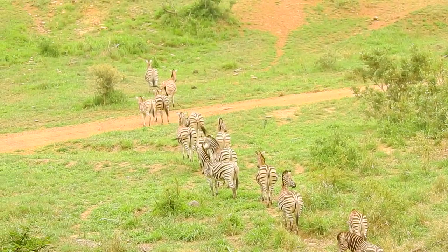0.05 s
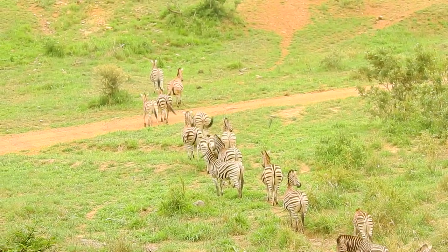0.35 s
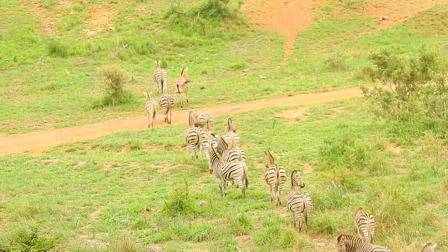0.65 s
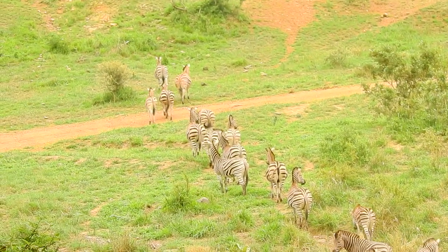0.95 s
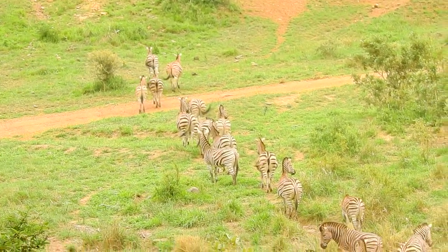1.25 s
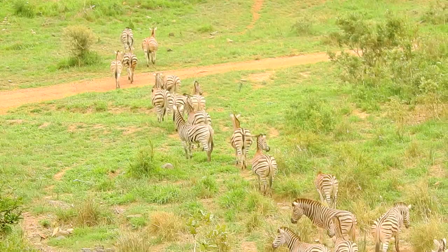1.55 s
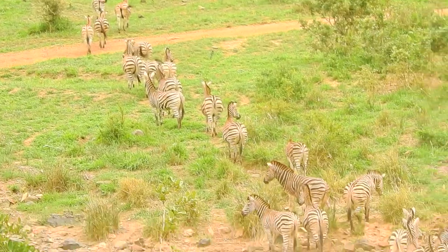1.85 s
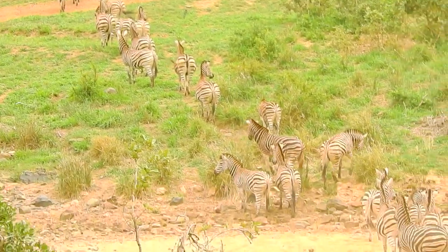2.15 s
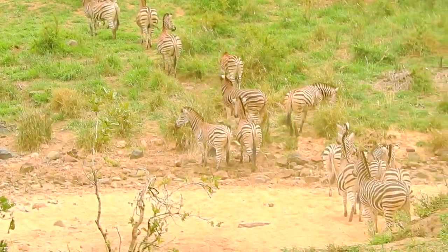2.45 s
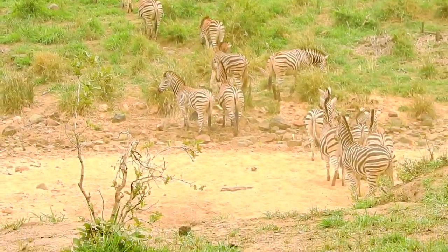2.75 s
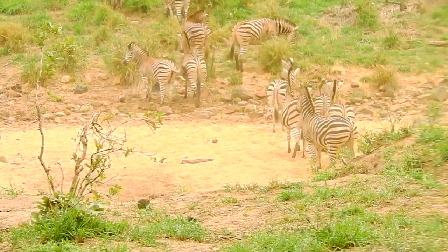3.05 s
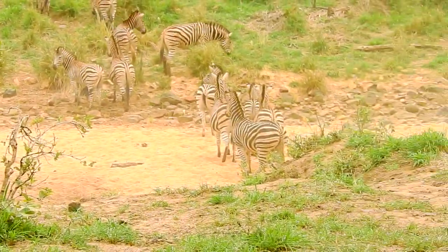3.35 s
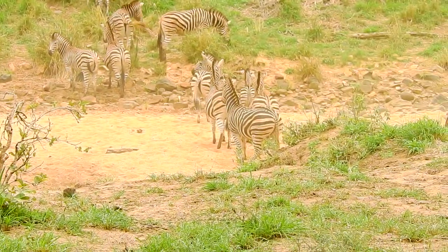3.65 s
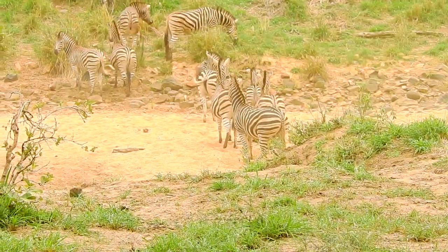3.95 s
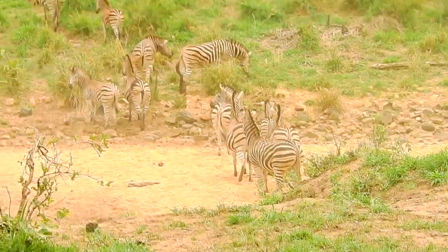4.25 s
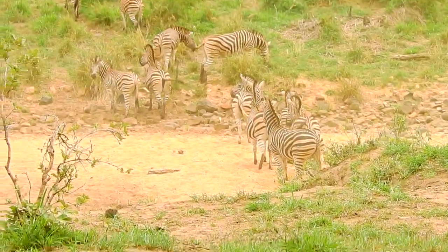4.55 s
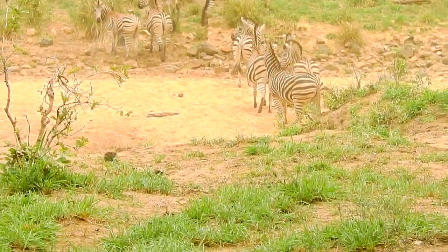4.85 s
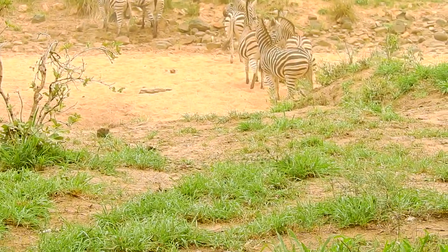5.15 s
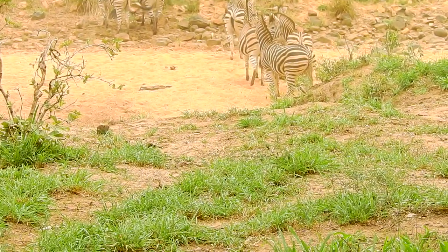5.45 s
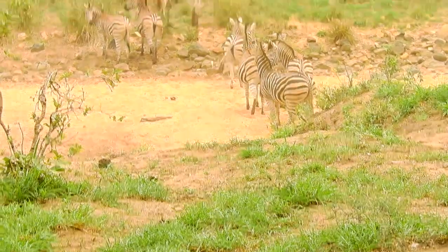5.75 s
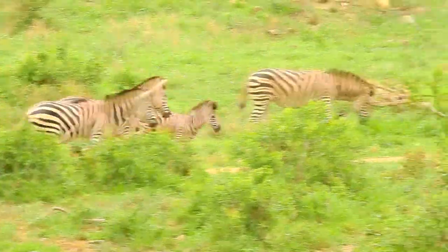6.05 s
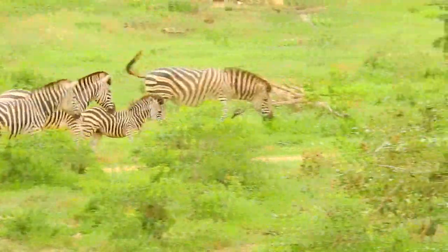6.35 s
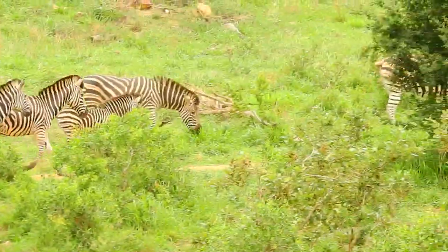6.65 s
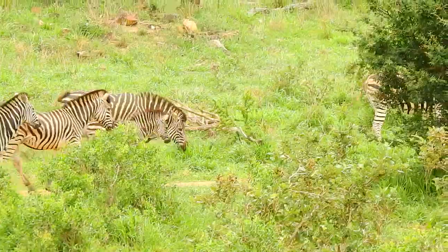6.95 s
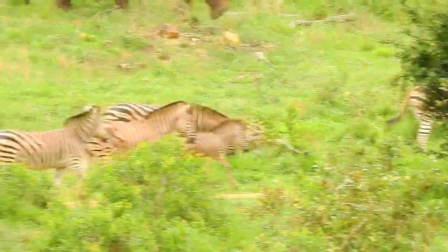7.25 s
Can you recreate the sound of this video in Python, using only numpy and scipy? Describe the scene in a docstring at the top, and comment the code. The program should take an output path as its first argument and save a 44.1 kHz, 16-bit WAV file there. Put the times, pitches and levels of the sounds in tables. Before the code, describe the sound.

Zebras walk over dry, stony ground in open bush, crunching gravel, snapping twigs and now and then knocking a hoof on stone. Grass hisses, cicadas buzz in short high pulses and small birds chirp throughout. The steps thin out after the first few seconds. Near the end, as a breeze rumbles more strongly on the microphone, one zebra gives a loud, hoarse bark with a faint echo.

```python
"""A zebra herd walks over dry, stony ground in open bush. From the start grass hisses, a breeze buffets
the two microphone ports, cicadas click their tymbals in buzzes and small birds whistle. Gravel and twigs
fracture underfoot; within the first second hooves also knock on stones and stalks snap. A thin whistle
sinks at 2.4 s and a soft hoot sounds at 4.2 s. Near 6.4 s, as the breeze grows, one zebra's vocal folds
vibrate unevenly in a hoarse bark, which a far slope reflects."""
import sys
import numpy as np
from scipy import signal
from scipy.fft import rfft, irfft, next_fast_len
from scipy.io import wavfile
from scipy.ndimage import uniform_filter1d

SR = 44100
rng = np.random.default_rng(int(sys.argv[2]) if len(sys.argv) > 2 else 0)


def inscribe(sig):
    """Save sig as 16-bit PCM at rate SR to the path in sys.argv[1].

    A 1-D sig is mono; a 2-D sig holds one channel per row.
    Samples are clipped to [-1, 1] before scaling.
    """
    pcm = np.round(np.clip(np.atleast_2d(sig).T, -1, 1) * 32767)
    wavfile.write(sys.argv[1], SR, pcm.astype(np.int16))


N = 331191
T = np.arange(N) / SR

# Levels in the tables are relative: each source adds its own gain.
# coherence of the two microphone ports: (frequency [Hz], correlation [0-1])
PORT_COHERENCE = [(60, 0.3), (250, 0.63), (650, 0.79), (3000, 0.82), (6800, 0.27), (9000, 0), (15000, 0)]
# spectra of the noisy sources: (frequency [Hz], spectral level [dB])
AIR_SPECTRUM = [(25, -20), (55, -4), (90, -11), (200, 1), (800, -2.5), (2000, -8), (2900, -13), (3900, -26),
                (5000, -6.5), (7100, -10.5), (9000, -9), (11000, -19.5), (15500, -30.5)]
RUSTLE_SPECTRUM = [(150, -24), (500, -5), (1400, -3.5), (2200, -7), (3400, -1.5), (5000, -1.5), (6600, 6),
                   (7800, -2), (10000, -12), (12000, -22), (15500, -50)]
BREEZE_SPECTRUM = [(20, -32), (40, -34), (60, -5), (80, -15), (115, 0), (170, 1.5), (250, -4.5), (400, -14),
                   (800, -27.5), (2000, -30), (12000, -80)]
CICADA_SPECTRUM = [(4000, -23.5), (6000, -41), (7000, -4), (8000, -10.5), (8900, 0.5), (9600, -1.5),
                   (10300, -4), (11300, -14), (12500, -74)]
GRIT_SPECTRUM = [(1500, -43), (4000, -12), (5300, -3.5), (6600, 8.5), (7600, 0), (9000, -12),
                 (11500, -25.5), (15500, -51)]
CRACK_SPECTRUM = [(700, -23), (1900, -9), (3200, 14.5), (4400, 5.5), (7000, -30)]
BODY_SPECTRUM = [(100, -16), (350, 4), (650, 6), (1000, 3), (1400, 4), (2000, -1.5), (4000, -16),
                 (15000, -50)]
SNAP_SPECTRUM = [(300, -16), (2000, -7), (4500, -4.5), (7000, 7), (9000, -1.5), (12000, -25), (15500, -31)]
# envelopes of the continuous sources: (time [s], level [dB])
RUSTLE_ENVELOPE = [(0.0, -44.5), (0.67, -45), (0.88, -40), (1.09, -42), (1.34, -51), (1.48, -44),
                   (1.65, -42), (2.38, -47), (2.76, -48), (3.05, -52), (3.66, -50.5), (3.87, -45),
                   (4.1, -56.5), (4.35, -48), (4.77, -56), (6.04, -51.5), (6.82, -46), (7.1, -54),
                   (7.51, -48.5)]
INSECT_ENVELOPE = [(0, -62), (3.2, -57), (3.5, -57), (4.7, -56), (5.5, -55), (7.5, -74)]
BREEZE_ENVELOPE = [(0, -70), (.85, -67), (1.0, -52.5), (1.3, -61), (1.5, -47.5), (1.68, -58), (1.95, -52.5),
                   (2.5, -52.5), (3.0, -62), (3.4, -72.5), (3.78, -53.5), (4.1, -69.5), (4.7, -68),
                   (5.05, -67), (5.25, -65.5), (5.8, -56.5), (6.1, -42.5), (6.9, -46), (7.51, -39.5)]
# puffs of air on the ports: (time [s], level [dB], centre [Hz], left minus right [dB])
PUFFS = [(0.946, -51, 129, -23), (1.106, -36.5, 156, -25), (1.431, -37, 145, 5), (1.539, -39.5, 159, -15),
         (1.775, -44.5, 121, -20), (1.868, -43.5, 167, 18), (1.958, -39.5, 180, 27.5),
         (2.146, -36, 122, -3), (2.429, -32, 180, 7), (2.768, -42.5, 144, -11), (2.966, -48, 246, -16),
         (3.13, -45, 183, -22), (3.488, -45.5, 170, -12), (3.972, -49, 140, -11), (4.908, -48, 85, -21),
         (4.962, -52.5, 149, -22), (5.111, -45, 216, 1), (5.343, -50, 167, -16), (5.405, -47, 143, -10),
         (5.57, -44.5, 199, -23.5), (5.65, -46.5, 173, -18), (5.776, -43, 169, -9), (5.942, -38, 296, 12),
         (6.378, -32.5, 158, -23), (6.592, -33.5, 166, 25), (7.364, -28.5, 130, 1), (7.466, -26, 142, -3)]
# cicada buzzes: (time [s], length [s], level [dB], nominal click rate [1/s], body resonance [Hz])
CICADA_BUZZES = [(0, 0.13, -41.5, 250, 8650), (.21, 0.28, -42.5, 432, 8850),
                 (0.443, 0.19, -47.5, 420, 8650), (0.623, .27, -42.5, 450, 8900),
                 (0.844, 0.24, -48, 370, 8650), (1.045, 0.3, -43.5, 380, 9000),
                 (1.274, 0.22, -47, 420, 8700), (1.453, 0.25, -40, 390, 8940),
                 (1.678, 0.23, -46, 470, 8700), (1.856, 0.3, -42.5, 432, 9040), (2.1, .18, -50, 640, 8650),
                 (2.286, .27, -42.5, 520, 8900), (2.523, .16, -45.5, 420, 8600),
                 (2.737, 0.27, -43, 432, 8700), (2.942, 0.17, -46, 420, 8650), (3.2, 0.28, -43, 432, 8840),
                 (3.599, .29, -43.5, 432, 8800), (4.017, 0.26, -42, 432, 8800),
                 (4.42, 0.24, -41.5, 432, 8700), (4.82, 0.28, -43, 470, 8800),
                 (5.199, 0.36, -42.5, 432, 8740), (5.5, 0.25, -44.5, 440, 8500),
                 (5.655, 0.3, -43, 432, 8850), (5.914, 0.12, -38.5, 430, 8160),
                 (6.06, 0.22, -49, 432, 8800), (6.348, .2, -39.5, 490, 8400), (6.53, 0.12, -48, 460, 8940),
                 (6.796, 0.23, -40.5, 450, 8200), (7.235, .21, -39, 590, 8300)]
# heavy steps on gravel and twigs: (time [s], level [dB], weight of crack and body [dB], crumbling [ms])
HEAVY_STEPS = [(0.0747, -31.5, -16.5, 1.4), (0.2766, -33.5, -35, 3.4), (0.29, -30, -29, 2),
               (0.3153, -32, -18, 2.9), (0.343, -32, -15, 7), (0.412, -32.5, -19, 1.8),
               (0.439, -38, -11, 2), (0.4757, -39.5, -5.5, 6), (0.584, -33.5, -37, 1.4),
               (0.6696, -27.5, -12.5, 1.7), (0.763, -31.5, -20, 2.4), (0.792, -31.5, -11, 4.9),
               (0.813, -30, -14.5, 8.7), (0.848, -29.5, -15, 4.3), (0.863, -33.5, -10.5, 2),
               (0.9226, -24.5, -38, 3.7), (0.9735, -28, -12.5, 5.2), (1.0092, -27.5, -18, 2.3),
               (1.2492, -24, -15.5, 2.9), (1.4315, -30, -17.5, 2.3), (1.4474, -33.5, -14.5, 2.1),
               (1.492, -21, -16.5, 3.3), (1.5278, -21, -18, 4), (1.5507, -31.5, -13, 5.3),
               (1.6335, -31.5, -11, 4.2), (1.649, -38, -21, 2), (2.1041, -36, -21, 2.6),
               (2.1623, -30.5, -14, 4.9), (2.1738, -21, -22, 3.6), (2.1778, -24.5, -23, 1.1),
               (2.1865, -26, -23, 4.3), (2.2017, -23.5, -28, 3.7), (2.2214, -28, -17, 4.1),
               (2.2372, -23, -26, 1.1), (2.2492, -20.5, -17.5, 2.4), (2.3249, -37, -26, 3.7),
               (2.3372, -32, -21, 0.89), (2.397, -22, -27, 0.96), (2.4887, -23.5, -18, 1.6),
               (2.5227, -32.5, -35, 1.9), (2.5496, -33.5, -19, 6.4), (2.5721, -36.5, -11, 2.4),
               (2.6419, -36, -20, 1.8), (2.7191, -23, -14.5, 1.6), (2.794, -30.5, -16.5, 17),
               (2.889, -29, -22.5, 3.9), (2.9779, -37.5, -15.5, 1.1), (3.183, -33, -15.5, 2.3),
               (3.8407, -41, -9, 6.2), (3.8847, -43, -2, 3.9), (4.1172, -21.5, -18.5, 1.26),
               (4.306, -33.5, -20, 2.8), (4.372, -46, -9, 3.4), (4.5324, -38.5, -10.5, 6.6),
               (5.0913, -49, -22, 3), (5.2804, -40, -18, 1.9), (5.3684, -28, -46, 1.7),
               (6.0704, -38, -11, 12), (6.2921, -44, -30, 1.2), (6.8827, -31.5, -15.5, 18)]
# bird notes by kind: (time [s], length before a 0.18 s cap [s], middle pitch [Hz], level [dB])
WHISTLE_NOTES = [(1.262, 0.081, 5230, -49), (1.582, 0.033, 4740, -48), (1.764, 0.033, 4940, -50),
                 (1.9, 0.039, 4700, -47.5), (1.99, 0.059, 5450, -50), (2.314, 0.02, 4600, -48),
                 (3.09, 0.055, 4300, -59), (3.25, 0.11, 5800, -59), (3.34, 0.064, 5300, -61),
                 (3.52, 0.05, 4860, -65), (3.725, 0.042, 5200, -66), (3.935, 0.053, 4950, -55.5),
                 (3.98, 0.11, 5000, -62), (4.145, 0.055, 5070, -51.5), (4.57, 0.068, 4950, -63),
                 (4.787, 0.06, 4720, -50.5), (5.052, 0.069, 5350, -52), (5.29, 0.085, 5420, -51.5),
                 (5.758, 0.062, 4720, -52.5), (5.79, 0.06, 4390, -53.5), (6.118, 0.066, 4780, -53.5),
                 (6.372, 0.078, 4980, -54), (6.505, 0.065, 4830, -57), (6.595, 0.074, 4700, -51)]  # high, falling ever faster
SLUR_NOTES = [(1.33, 0.12, 2720, -64), (1.908, 0.054, 3440, -53), (4.074, 0.045, 3200, -58),
              (4.255, 0.026, 3240, -58), (4.712, 0.074, 2825, -56.5), (5.478, 0.038, 3540, -49.5),
              (5.679, 0.053, 2790, -53.5), (5.743, 0.068, 4820, -48), (6.016, 0.073, 3120, -62),
              (6.292, 0.073, 2930, -60), (6.51, 0.079, 2990, -53.5), (6.985, 0.043, 2400, -54),
              (7.135, 0.098, 2670, -60)]  # dropping, then levelling off
PIP_NOTES = [(0.08, 0.084, 3850, -54), (0.085, 0.035, 5770, -45), (0.155, 0.033, 2540, -52),
             (0.72, 0.06, 3900, -51.5), (3.022, 0.065, 4610, -52), (4.607, .02, 3600, -59),
             (4.632, 0.018, 3300, -57)]  # loudest near the onset
RISING_NOTES = [(0.143, 0.017, 4100, -50), (1.695, 0.055, 4200, -51), (5.6, 0.08, 1770, -61.5)]
TICK_NOTES = [(5.18, 0.019, 3250, -51.5), (5.336, 0.016, 3600, -49), (5.469, 0.013, 4520, -46)]  # very short, ending in a steep fall
WHEEZE_NOTES = [(1.305, 0.155, 4450, -48.5), (1.335, 0.115, 5270, -52)]  # two sinking voices
DRAWL_NOTES = [(0.205, 0.11, 3484, -49), (0.27, 0.24, 2840, -57), (0.765, 0.23, 3520, -50),
               (0.89, 0.1, 2900, -66), (3.654, 0.061, 3130, -56.5)]  # drawn out, barely sinking
RASP_NOTES = [(0.15, 0.085, 3550, -50), (0.77, 0.16, 3560, -56), (1.725, 0.12, 5900, -45),
              (1.955, 0.05, 5670, -56), (3.275, 0.038, 2414, -51), (3.425, 0.043, 2600, -56),
              (3.562, 0.039, 2680, -59), (3.72, 0.039, 2695, -62), (4.385, 0.051, 3400, -55),
              (4.68, 0.062, 4370, -58), (4.84, 0.078, 4300, -61), (5.065, 0.045, 4260, -54),
              (5.82, 0.09, 4700, -54.5), (7.0, 0.063, 3130, -57), (7.207, 0.053, 2300, -53.5)]  # noisy, from deep in the bushes
# their contours: (start / middle pitch [ratio], end / middle pitch [ratio], rasp [0-1], peak place [0-1])
WHISTLE_CONTOUR = (1.09, 0.825, 0.25, .64)
SLUR_CONTOUR = (1.08, 0.97, 0.25, 0.36)
PIP_CONTOUR = (1.01, 0.74, 0.19, 0.15)
RISING_CONTOUR = (0.76, 1.11, 0.41, 0.67)
TICK_CONTOUR = (0.88, 0.68, 0.94, 0.32)
WHEEZE_CONTOUR = (1.09, 0.915, 0.3, .4)
DRAWL_CONTOUR = (1.02, 0.99, 0.62, 0.58)
RASP_CONTOUR = (1.4, 1, 0.88, 0.47)
# quick trills: (time [s], notes [count], spacing [s], note length [s],
# start pitch [Hz], middle pitch [Hz], end pitch [Hz], rasp [0-1], level [dB])
BIRD_TRILLS = [(4.435, 6, 0.04, 0.04, 3220, 2690, 3170, .12, -57),
               (4.953, 6, 0.038, 0.0093, 5200, 5680, 6500, 0.3, -53),
               (5.702, 4, 0.044, 0.0146, 3060, 2470, 2260, .4, -58),
               (6.903, 3, 0.031, 0.00716, 5000, 5660, 6430, 0.3, -47)]
# birdsong that arrives by way of the bushes: (time [s], share of power [0-1])
SCATTERED_SHARE = [(0, .6), (1, .6), (1.3, .35), (2.1, .45), (3.1, .5), (4.1, .36), (7.5, .3)]
# hoof impacts on stone: (time [s], level [dB], resonance [Hz])
HOOF_KNOCKS = [(0.475, -40, 600), (0.97, -49, 1280), (1.175, -41, 726), (1.251, -32.5, 606),
               (1.468, -40, 600), (1.565, -39, 1280), (2.209, -41, 536), (2.373, -37, 920),
               (2.587, -38, 950), (4.174, -43.5, 930), (4.573, -38, 621), (4.873, -44, 1240),
               (5.921, -43.5, 1000), (7.202, -42, 1080), (7.236, -38.5, 1110), (7.317, -36.5, 584),
               (7.374, -32.5, 562)]
# dry stalks breaking: (time [s], level [dB])
STALK_SNAPS = [(0.9236, -29.5), (.9741, -33), (1.0098, -33), (1.2486, -30), (2.2029, -29), (2.3369, -29.5),
               (2.717, -33), (2.72, -26), (3.965, -47), (4.3072, -38), (5.986, -41), (6.0712, -38.5),
               (6.0765, -42), (6.2927, -41.5)]
# the bark, a loud push and a weaker one: (time [s], pitch [Hz], level [dB], roughness [0-1])
BARK_CONTOUR = [(6.44, 314.5, -51, 0.4), (6.525, 326.5, -45, 0.81), (6.552, 376.4, -33, 0.75),
                (6.588, 363.6, -30.5, 0.64), (6.617, 361.3, -28.5, 0.63), (6.632, 359.3, -29, 0.52),
                (6.668, 362.6, -27, 0.38), (6.688, 370.5, -23.5, 0.49), (6.722, 376, -23, 0.13),
                (6.743, 375.3, -28.5, 0.72), (6.795, 366.8, -33, 0.86), (6.835, 373.8, -27, 0.31),
                (6.873, 362.7, -28.5, 0.23), (6.945, 334.2, -39, 0.76), (6.98, 319.6, -34, 0.34),
                (7.005, 316, -41, 0.5), (7.04, 322, -45, 0.6)]
# throat resonances: (frequency [Hz], bandwidth [Hz], gain [dB])
FORMANTS = [(450, 224, -2), (648, 200, 2), (1084, 56, -7.5), (1346, 244, -6.5), (1850, 94, -28.5),
            (2200, 260, -26.5)]


def gain_of(db):
    """The decibel scale: 20 dB is a factor of ten in amplitude."""
    return 10 ** (np.asarray(db) / 20)


def unit_rms(x):
    """Normalisation to unit mean power."""
    return x / np.sqrt(np.mean(x ** 2) + 1e-20)


def curve_at(points, hz):
    """Interpolation on a logarithmic frequency axis."""
    f, value = np.transpose(points)
    return np.interp(np.log(hz + 1), np.log(f + 1), value)


def add(mix, s, sound):
    """Superposition: a sound joins the mix at time s."""
    part = mix[..., max(round(s * SR), 0):][..., :sound.shape[-1]]
    part += sound[..., :part.shape[-1]]


def coloured(x, spectrum):
    """Linear filtering: each frequency is weighted by the given spectrum."""
    size = next_fast_len(x.shape[-1])
    gain = gain_of(curve_at(spectrum, np.fft.rfftfreq(size, 1 / SR)))
    return irfft(rfft(x, size) * gain, size)[..., :x.shape[-1]]


def wander(size, corner_hz):
    """Random modulation: low-passed noise of unit rms."""
    padded = next_fast_len(size)
    rolloff = 1 + (np.fft.rfftfreq(padded, 1 / SR) / corner_hz) ** 4
    return unit_rms(irfft(rfft(rng.standard_normal(padded)) / rolloff, padded)[:size])


def resonate(x, hz, width_hz):
    """A damped resonator with a peak gain near one."""
    r = np.exp(-np.pi * width_hz / SR)
    return 2 * signal.lfilter([1 - r], [1, -r * np.exp(2j * np.pi * hz / SR)], x).real


def ports(pair):
    """Partial coherence: two independent signals become left and right, most alike in the midrange."""
    size = next_fast_len(N)
    a, b = rfft(pair, size)
    same = np.clip(curve_at(PORT_COHERENCE, np.fft.rfftfreq(size, 1 / SR)), 0, 1)
    return irfft(np.array([a, same * a + np.sqrt(1 - same ** 2) * b]), size)[:, :N]


def scatter(x, t60, wet_db):
    """Scattering: ground and bushes add sparse, decaying reflections, different at each port."""
    t = T[:SR // 2]
    reflections = rng.standard_normal((2, len(t))) * (rng.random((2, len(t))) < .06)
    tail = reflections * gain_of(-60 * t / t60) * (t > .004)
    tail /= np.linalg.norm(tail, axis=1, keepdims=True)
    return x + gain_of(wet_db) * signal.fftconvolve(np.atleast_2d(x), tail, axes=1)[:, :N]


def air(level_db=-54.5):
    """Ambient noise: the nearly steady, far hiss of the open bush."""
    hiss = unit_rms(coloured(rng.standard_normal((2, N)), AIR_SPECTRUM))
    return gain_of(level_db + 0.55 * wander(N, 2.5)) * hiss


def rustle(ticks_per_s=1400):
    """Shot noise: tiny ticks of grit and dry grass over an equal hiss, swelling in clumps."""
    ticks = rng.random(N) < ticks_per_s / SR
    grains = unit_rms(ticks * rng.standard_normal((2, N))) + rng.standard_normal((2, N))
    level_db = np.interp(T, *np.transpose(RUSTLE_ENVELOPE)) - .5 + 2.53 * wander(N, 21)
    return gain_of(level_db) * unit_rms(coloured(grains, RUSTLE_SPECTRUM))


def insect_ring(hz=7330, width_hz=220):
    """Narrow-band noise: the fuzzy tone of an insect far off in the grass."""
    tone = resonate(resonate(rng.standard_normal((2, N)), hz, width_hz), hz, width_hz)
    return gain_of(np.interp(T, *np.transpose(INSECT_ENVELOPE)) - 5) * unit_rms(tone)


def breeze(rise_s=0.0064, puff_db=-11, width_hz=90):
    """Pressure fluctuations of moving air: a lumpy rumble, incoherent between the ports, with puffs."""
    lumps_db = np.interp(T, *np.transpose(BREEZE_ENVELOPE)) + 3.3 + 3.85 * wander(N, 28)
    out = gain_of(lumps_db) * unit_rms(coloured(rng.standard_normal((2, N)), BREEZE_SPECTRUM))
    t = T[:6000]
    for s, db, hz, pan_db in PUFFS:
        push = coloured(rng.standard_normal((2, len(t))) * t * np.exp(-t / rise_s), BREEZE_SPECTRUM)
        puff = np.array([unit_rms(side) for side in resonate(push, hz, width_hz) + 0.086 * push])
        add(out, s, gain_of(db + puff_db + np.array([[pan_db], [-pan_db]]) / 2) * puff)
    return out


def cicadas(sag=.085, settle_s=.11, jitter=.003, breathy=.3, lag_s=.000052, gain_db=-2.5):
    """Pulse-driven resonance: tymbal clicks excite the body, starting fast and settling in each buzz."""
    out = np.zeros(N)
    for s, length, db, nominal_rate, body_hz in CICADA_BUZZES:
        t = T[:int(length * SR)]
        swell = 0.9 * abs(np.sin(np.pi * t / length)) ** 0.9
        spectrum = [(hz * body_hz / 8900, level) for hz, level in CICADA_SPECTRUM]  # peak at body_hz
        rate = nominal_rate * (1 + 0.012 * rng.uniform(-0.92, 1))
        cycles = np.cumsum(rate * (1 + sag * np.exp(-t / settle_s) + jitter * wander(len(t), 130))) / SR
        clicks = np.sinc((cycles % 1 - .5) * 64) * (1 + .12 * wander(len(t), 300))
        fizz = rng.standard_normal(len(t)) * np.sin(np.pi * cycles) ** 2
        drive = np.sqrt(1 - breathy) * unit_rms(clicks) + np.sqrt(breathy) * unit_rms(fizz)
        add(out, s, gain_of(db + gain_db) * swell * unit_rms(coloured(drive, spectrum)))
    size = next_fast_len(N)
    delay = np.exp(-2j * np.pi * lag_s * np.fft.rfftfreq(size, 1 / SR))
    right = irfft(rfft(out, size) * delay, size)[:N]  # a later arrival places them to the left
    return scatter(np.array([out, right]), t60=0.16, wet_db=-5.5)


def whistle(length, start_hz, middle_hz, end_hz, rasp, peak_at=0.82, waver=0.0049, flutter_db=2.5):
    """Modulation of a tone: a bird's note glides through three pitches; rasp smears it into a band."""
    u = np.linspace(0, 1, int(np.clip(length, .004, .18) * SR))
    hz = np.polyval(np.polyfit([0, .5, 1], [start_hz, middle_hz, end_hz], 2), u)
    smear_hz = 260 * (1 + rasp)
    drift, flutter, real, imaginary = (wander(8192, f)[:len(u)] for f in (200, 80, smear_hz, smear_hz))
    smear = np.sqrt(2 - 2 * rasp ** 2) + rasp * (real + 1j * imaginary)
    cycles = np.cumsum(hz * (1 + waver * drift)) / SR
    note = (smear * np.exp(2j * np.pi * cycles)).imag
    swell = np.sin(np.pi * np.interp(u, [0, peak_at, 1], [0, .5, 1]))
    return note * gain_of(flutter_db * flutter) * swell


def far_birds(count=100, faintest_db=-62.5, spread_db=4):
    """Reverberation blurs a distant chorus of falling notes into faint chatter."""
    out = np.zeros(N)
    for k, (when, pitch, length, fall, size) in enumerate(rng.random((count, 5))):
        hz, bend = 2600 + 3400 * pitch, 0.1 * fall + 0.03
        note = whistle(0.035 + 0.055 * length, hz * (1 + bend), hz, hz * (1 - bend), rasp=0.55)
        add(out, (k + when) / count * T[-1], gain_of(faintest_db + spread_db * size) * note)
    return scatter(out, t60=0.48, wet_db=-2)


def crunch(crumble_ms, weight_db, lead_s, scuff_s=0.0035, snap_s=0.00039, trickle_s=0.01):
    """Brittle fracture: a burst of tiny breaks thins out; crack and hollow body outlast the grit."""
    t = np.arange(4096) / SR - lead_s
    after = np.maximum(t - .001, 0)
    grit_fade = np.exp(-after * 1000 / crumble_ms)
    body_fade = np.exp(-after * 1000 / (crumble_ms * 3.7))
    loose = (crumble_ms / 2) ** 1.04  # loose grit scuffs before and trickles after; a twig just snaps
    loading = np.where(t > .001, 1, loose * gain_of(-20) * np.exp(np.minimum(t, 0) / scuff_s))
    trickle = loose * gain_of(-18) * np.exp(-after / trickle_s)
    fractures = rng.standard_normal((2, len(t))) * loading
    fractures *= gain_of(7.1 * np.minimum(rng.standard_normal(len(t)), 2))  # breaks of uneven size
    first_break = unit_rms(rng.choice([-1, 1], (2, len(t))) * np.exp(-abs(t - .001) / snap_s))
    fractures += 1.25 / crumble_ms * np.std(fractures * grit_fade) * first_break
    out = np.zeros((2, len(t)))
    for spectrum, db, fade in ((GRIT_SPECTRUM, -4, grit_fade),
                               (CRACK_SPECTRUM, weight_db - 1.4, body_fade),
                               (BODY_SPECTRUM, weight_db - 2, body_fade)):
        burst = coloured(fractures * (fade + trickle), spectrum)
        out += gain_of(db) * np.array([unit_rms(side) for side in burst])
    twig_ring = resonate(fractures * body_fade, hz=rng.uniform(1289, 3396), width_hz=172)
    return out + gain_of(weight_db - 3.5) * np.array([unit_rms(side) for side in twig_ring])


def steps(light_count=14, light_ms=4.7, gain_db=-9.5, spread_db=6, lead_s=.012):
    """Superposed crunches: heavy steps, and random lighter ones that crowd where the rustle is strong."""
    rustle_db = np.interp(T, *np.transpose(RUSTLE_ENVELOPE))
    energy = np.cumsum(gain_of(rustle_db) ** 2)
    footfalls = list(HEAVY_STEPS)
    for k, (when, size, weight) in enumerate(rng.random((light_count, 3))):
        at = np.searchsorted(energy, energy[-1] * (k + when) / light_count)
        db = rustle_db[at] + 2.3 + spread_db * (size - .5)
        footfalls.append((T[at], db, -16.5 + spread_db * (weight - .5), light_ms))
    out = np.zeros((2, N))
    for s, db, weight_db, crumble_ms in footfalls:
        add(out, s - lead_s, gain_of(db + gain_db) * crunch(crumble_ms, weight_db, lead_s))
    return scatter(out, t60=0.13, wet_db=-8.5)


def notes(rows, contour):
    """Transposition: one contour is sung at different pitches, lengths and levels."""
    start, end, rasp, peak_at = contour
    out = np.zeros(N)
    for s, length, hz, db in rows:
        add(out, s, gain_of(db) * whistle(length, hz * start, hz, hz * end, rasp, peak_at))
    return out


def birds(gain_db=6, deep_db=-3.5):
    """Direct and scattered paths share the song's power; raspy callers sit deeper in the bushes."""
    song = notes(WHISTLE_NOTES, WHISTLE_CONTOUR) + notes(SLUR_NOTES, SLUR_CONTOUR)
    song += notes(PIP_NOTES, PIP_CONTOUR) + notes(RISING_NOTES, RISING_CONTOUR)
    song += notes(TICK_NOTES, TICK_CONTOUR) + notes(WHEEZE_NOTES, WHEEZE_CONTOUR)
    song += notes(DRAWL_NOTES, DRAWL_CONTOUR)
    for s, count, spacing, *shape, db in BIRD_TRILLS:
        for k in range(count):
            add(song, s + k * spacing, gain_of(db) * whistle(*shape))
    share = np.interp(T, *np.transpose(SCATTERED_SHARE))
    direct, hidden = np.sqrt(1 - share) * song, np.sqrt(share) * song
    echo = scatter(hidden, t60=.5, wet_db=0) - hidden
    deep = scatter(notes(RASP_NOTES, RASP_CONTOUR), t60=.7, wet_db=-1)
    return gain_of(gain_db) * (direct + echo + gain_of(deep_db) * deep)


def knocks(rise_s=0.000081, decay_s=0.0096, width_hz=500, gain_db=-12):
    """Impact excitation: a hoof strikes a stone, giving a short clatter with one broad resonance."""
    out, t = np.zeros(N), T[:3000]
    envelope = (1 - np.exp(-t / rise_s)) * np.exp(-t / decay_s)
    for s, db, hz in HOOF_KNOCKS:
        blow = coloured(rng.standard_normal(len(t)) * envelope, BODY_SPECTRUM)
        knock = resonate(blow, hz, width_hz) + 0.16 * blow
        add(out, s, gain_of(db + gain_db) * unit_rms(knock))
    return scatter(out, t60=0.43, wet_db=-10.5)


def snaps(decay_s=0.0015, gain_db=-4):
    """A brief transient has a broad spectrum: a dry stalk breaks at once with a bright click."""
    out, t = np.zeros((2, N)), T[:256]
    for s, db in STALK_SNAPS:
        crack = coloured(rng.standard_normal((2, len(t))), SNAP_SPECTRUM) * np.exp(-t / decay_s)
        add(out, s, gain_of(db + gain_db) * unit_rms(crack))
    return scatter(out, t60=0.062, wet_db=-7)


def thin_call(start_s=2.41, length_s=0.45, pitches_hz=(8300, 7600, 7300), waver=0.0082, level_db=-55):
    """A frequency glide: one high, faint whistle sinks ever more slowly."""
    u = np.linspace(0, 1, int(length_s * SR))
    hz = np.polyval(np.polyfit([0, .5, 1], pitches_hz, 2), u)
    cycles = np.cumsum(hz * (1 + waver * wander(len(u), 100))) / SR
    envelope = gain_of(level_db + 1.7 * wander(len(u), 60)) * signal.windows.tukey(len(u), .3)
    out = np.zeros(N)
    add(out, start_s, envelope * np.sin(2 * np.pi * cycles))
    return scatter(out, t60=.3, wet_db=-1)


def hoot(start_s=4.204, hz=220, gain_db=-37.5, rise_s=0.0044, decay_s=0.028):
    """A damped sinusoid: one soft, low, hollow note that dies away quickly."""
    out, t = np.zeros(N), T[:6000]
    envelope = (1 - np.exp(-t / rise_s)) * np.exp(-t / decay_s)
    add(out, start_s, gain_of(gain_db) * envelope * np.sin(2 * np.pi * hz * t))
    return scatter(out, t60=0.36, wet_db=-15)


def vocal_folds(hz, rough, rattle_hz=74, smear_hz=110, rasp=2.8):
    """Modulation by uneven cycles: side bands and noise surround each harmonic, the high ones most."""
    size = len(hz)
    cycles = np.cumsum(hz * (1 + 0.037 * rough * wander(size, 156))) / SR
    rattle = np.sin(2 * np.pi * np.cumsum(rattle_hz * (1 + 0.175 * wander(size, 24.3))) / SR)
    drive = rasp * rough * rng.standard_normal(size)
    for k in range(1, 8):
        hoarse = np.clip(rough + 0.08 * max(k - 2, 0), 0, 1)
        smear = wander(size, smear_hz) + 1j * wander(size, smear_hz)
        amplitude = 1 - hoarse + hoarse * (0.52 * rattle + 0.62 * smear)
        drive += (amplitude * np.exp(2j * np.pi * k * cycles)).real
    return drive


def bark(open_s=6.672, open_width_s=0.084, throb_db=6.5, throb_lift_hz=13.8, flutter_db=1.8):
    """Source and filter: the throat shapes the folds' tone; the opening mouth lifts the upper formants."""
    times, *columns = np.transpose(BARK_CONTOUR)
    t = np.arange(times[0], times[-1], 1 / SR)
    hz, effort_db, rough = (np.interp(t, times, column) for column in columns)
    mouth_db = -8.5 + 12.5 * np.exp(-((t - open_s) / open_width_s) ** 2)
    mouth_db -= 3 * np.maximum(t - open_s, 0)  # further closing dulls the second push
    # three quick throbs raise level and pitch early in the bark
    throb = sum(np.exp(-((t - 6.572 - k * 0.0364) / 0.00886) ** 2) for k in range(3))
    drive = vocal_folds(hz + throb_lift_hz * throb, rough)
    voice = np.zeros(len(t))
    for k, (f, width, db) in enumerate(FORMANTS):
        lift_db = mouth_db * np.clip((f - 700) / 700, 0, 1.3)
        voice += (-1) ** k * gain_of(db + lift_db) * resonate(resonate(drive, f, width), f, width)
    voice /= np.sqrt(uniform_filter1d(voice ** 2, size=700) + 1e-12)  # the envelope alone sets the level
    level_db = effort_db + throb_db * throb + flutter_db * wander(len(t), 70)
    out = np.zeros(N)
    add(out, times[0], gain_of(level_db) * voice * signal.windows.tukey(len(t), .05))
    return out


def hillside(x, delay_s=.24, t60=1.5, echo_db=-23.5):
    """Diffuse reflection: the far slope adds a soft, smeared echo."""
    echo = np.zeros((2, N))
    add(echo, delay_s, scatter(x, t60, echo_db) - x)
    return x + ports(echo)


def scene():
    """Superposition of all sources at the two ports; the surrounding sounds lean slightly left."""
    around = ports(air() + rustle() + insect_ring() + steps() + snaps()) * gain_of([[.5], [-.5]])
    return (around + breeze() + cicadas() + far_birds() + birds() + knocks()
            + thin_call() + hoot() + hillside(bark()))


def record(dry, edge_hz=15850):
    """Band limiting: a steep low-pass filter removes the highest treble."""
    lowpass = signal.firwin(511, edge_hz, window=("kaiser", 9), fs=SR)
    return signal.oaconvolve(dry, lowpass[None], "same")


dry = scene()
out = record(dry)
inscribe(out)
```